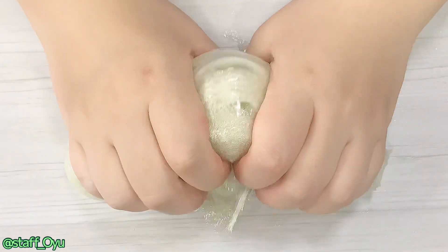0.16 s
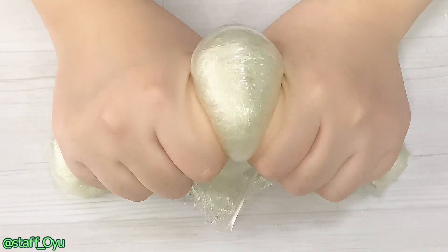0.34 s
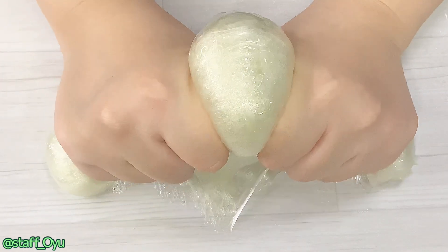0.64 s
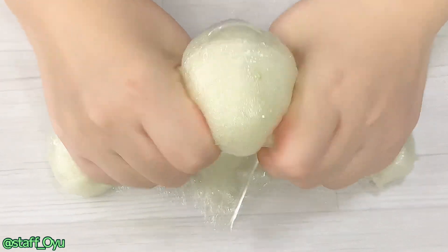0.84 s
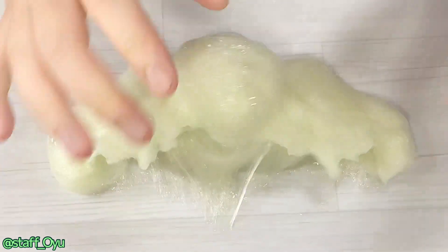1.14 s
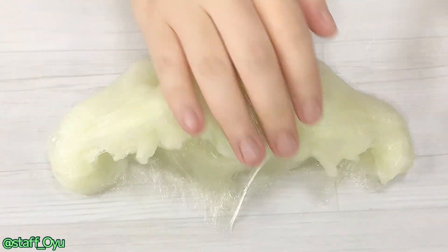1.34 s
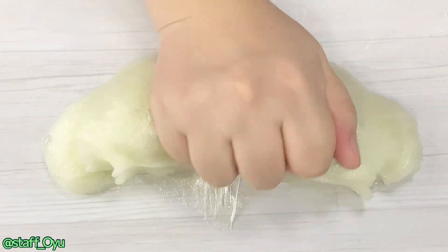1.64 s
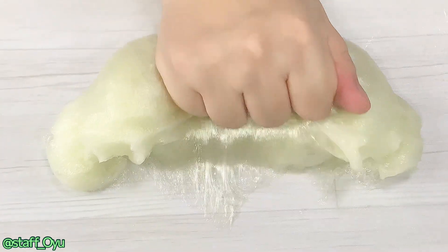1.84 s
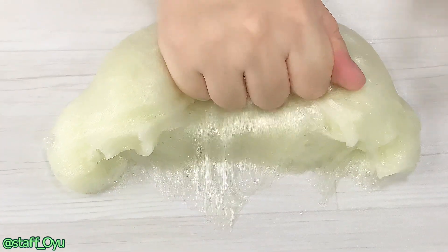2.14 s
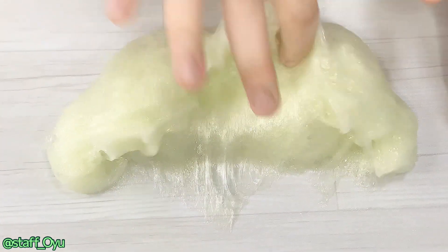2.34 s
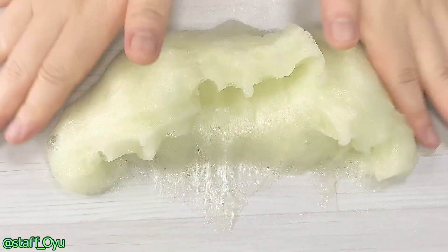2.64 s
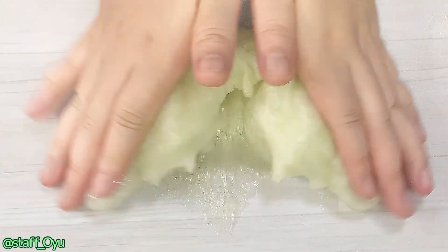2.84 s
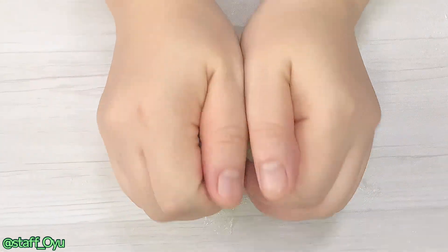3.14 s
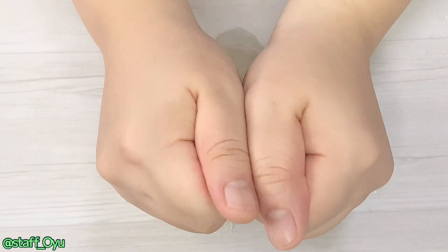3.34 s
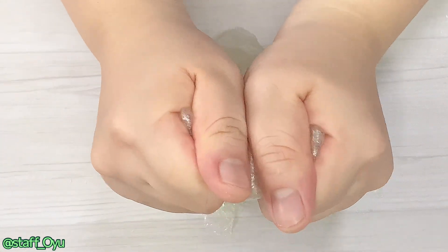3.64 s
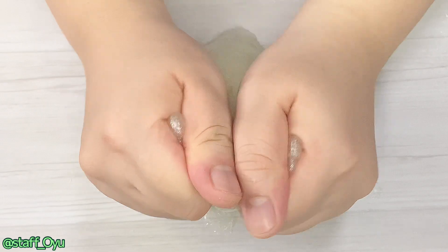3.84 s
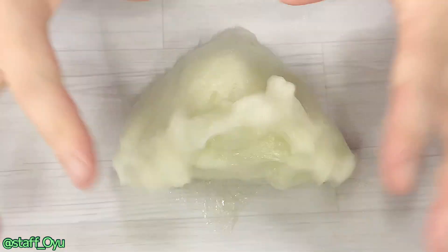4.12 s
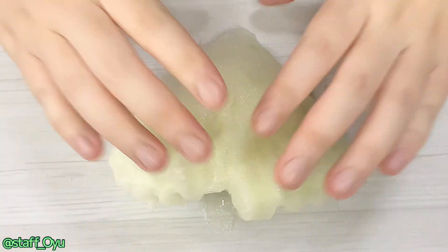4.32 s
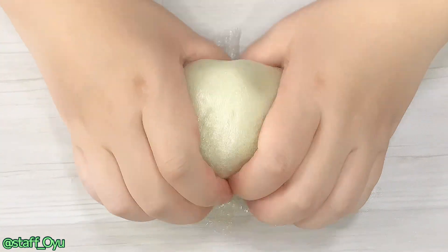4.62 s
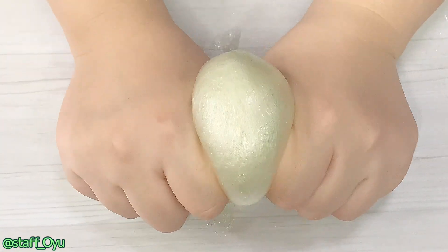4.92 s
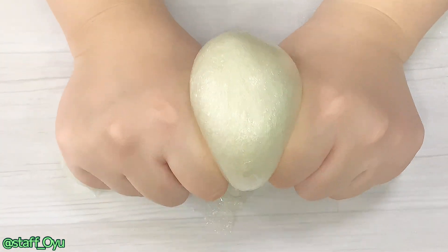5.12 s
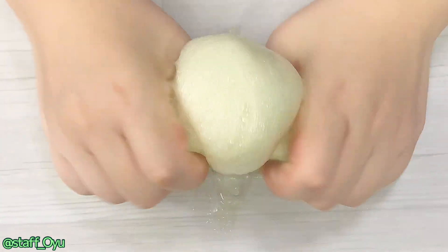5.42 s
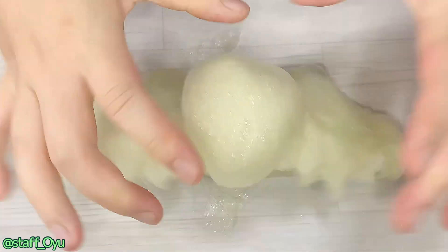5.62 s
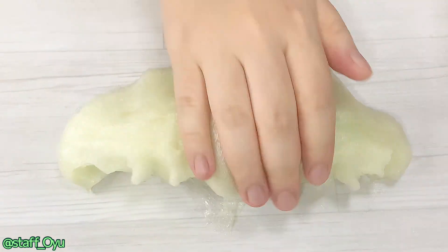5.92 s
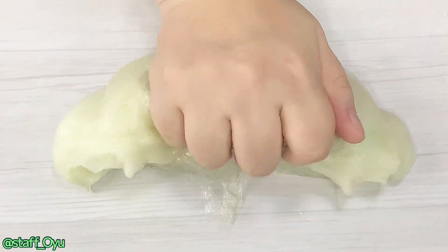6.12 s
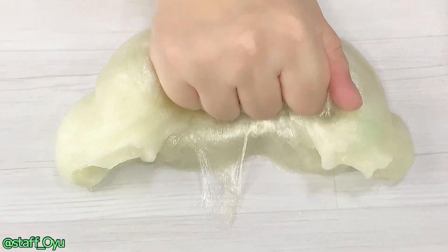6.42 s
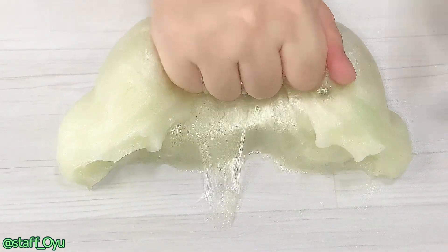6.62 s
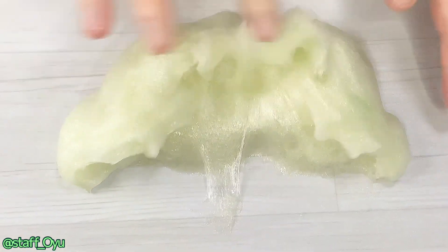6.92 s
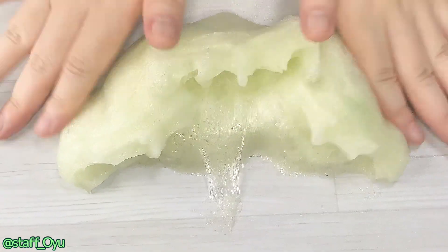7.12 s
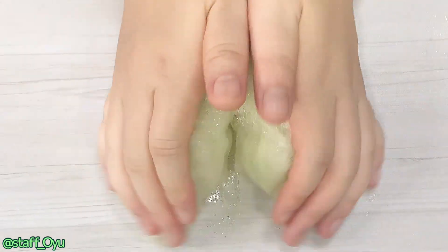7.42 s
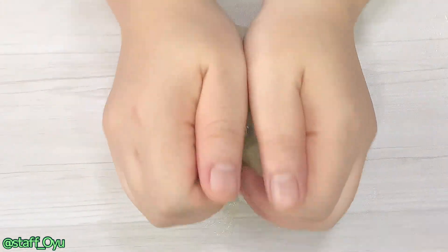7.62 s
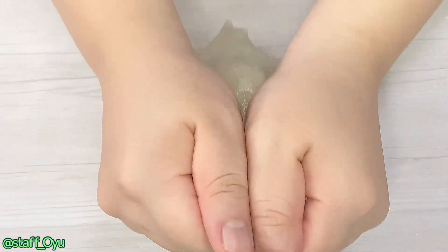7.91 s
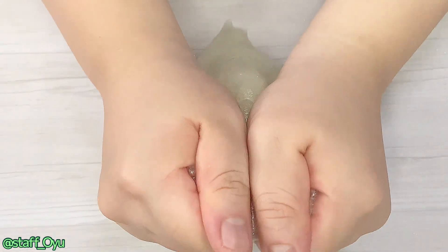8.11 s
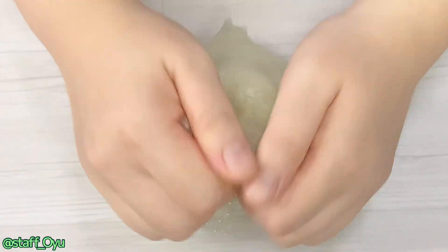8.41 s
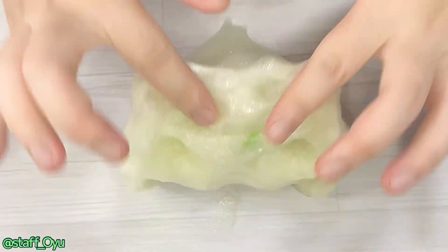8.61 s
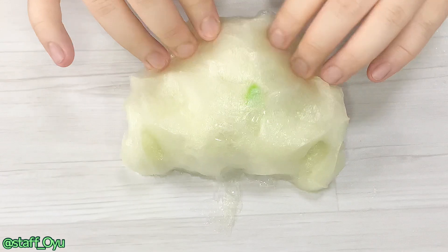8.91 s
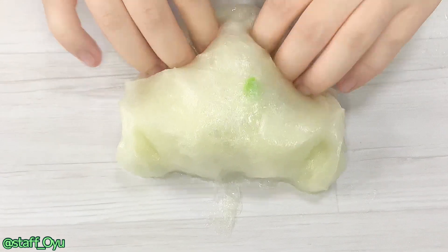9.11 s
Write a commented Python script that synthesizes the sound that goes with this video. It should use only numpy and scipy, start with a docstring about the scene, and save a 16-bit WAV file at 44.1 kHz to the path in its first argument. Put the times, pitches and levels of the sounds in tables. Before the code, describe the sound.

Hands squeeze wet slime on a table, close to the microphone in a dry room, over a faint steady low hum and hiss. From the start to about 0.7 seconds air pockets burst in quick sharp clicks and wet pops within a sticky fizz, ending in a tiny click-like squeak. The hands peel free with a soft gurgling squelch near 0.8. More crackling bursts come at 1.5 to 2, 3.1 to 3.7, 4.6 to 5.2, 6 to 6.6 and 7.6 to 8.3 seconds. The one around 3.5 is the densest and includes a low puff of air. Each is followed by a quieter sticky release, near 2.2, 3.9, 5.4, 6.7 and 8.4 seconds, with short lulls between rounds. Soft thuds sound on the table now and then, most clearly near 5.4. After 8.6 only a few faint ticks remain until just past 9 seconds.

```python
"""Squeezing wet slime

Hands squeeze and release a lump of wet slime on a table, close to a microphone with two openings.
Trapped air pockets burst with a snap, a falling pop and a knock in the table top. Sticky film peels
from the skin in a gurgling fizz, escaping air puffs and squeaks, and fingers thud softly.
A mains hum and a faint hiss lie under it all."""
import sys
import numpy as np
from scipy import signal
from scipy.fft import rfft, irfft
from scipy.io import wavfile
from scipy.ndimage import uniform_filter1d

SR = 44100
rng = np.random.default_rng(int(sys.argv[2]) if len(sys.argv) > 2 else 0)


def wrap_up_sound(samples):
    """Save the sound to the file named by the first command line argument, as 16-bit audio."""
    columns = np.atleast_2d(samples).T
    # keep every value between -1 and 1, then stretch to whole-number steps
    tamed = np.clip(columns, -1, 1)
    steps = np.round(tamed * 32767).astype(np.int16)
    wavfile.write(sys.argv[1], SR, steps)


N = 408366

# Air pockets bursting: t/s, snap/dB, its bright part over its dull part/dB,
# upper pop/dB, lower pop/dB, table knock/dB
POCKETS = [(0.1024, -26.5, -7, -26.5, -35.5, -48.5), (0.1545, -21, -18, -30, -22, -38),
           (0.171, -30.5, -9, -26, -26, -41.5), (0.1791, -24.5, -18.5, -32, -29.5, -41),
           (0.2221, -33, 6.5, -26.5, -36, -56.5), (0.2564, -20.5, -10, -9.5, -11.5, -22),
           (0.2643, -21.5, -16, -15, -47.0, -46), (0.3082, -25.5, -7.5, -14.5, -23.5, -49),
           (0.3294, -20.5, 11.5, -24, -27.5, -48), (0.338, -24.5, -8, -31, -38.5, -61),
           (0.3592, -16.5, 14.5, -32.5, -32, -65), (0.402, -22, 17.5, -35.5, -37.5, -42.5),
           (0.4127, -14, -9.5, -9.5, -24, -31.5), (0.4409, -19.5, 6.5, -11, -25, -61.5),
           (0.4711, -20, 6.5, -33, -47.5, -61), (0.496, -9.5, 8.5, -16.5, -21, -46.5),
           (0.5059, -18, -1.5, -11, -17.5, -36), (0.511, -14, 4.5, -24, -44, -55.5),
           (0.519, -11.5, 9, -21.5, -25.5, -37), (0.53, -16, 11.5, -19, -26.0, -50.5),
           (0.5492, -22.5, 1, -30.5, -37.5, -44.5), (0.6477, -19.5, 2.5, -37, -29, -39),
           (0.865, -27, 0, -35, -29, -28.5), (1.5007, -32.5, -2.5, -25, -63.5, -52),
           (1.5214, -27, -0.5, -37, -47, -52), (1.5265, -47, 6, -25.5, -24.5, -41),
           (1.5412, -25, 12, -35.5, -33.5, -62.5), (1.553, -26, -4.5, -16, -19, -36),
           (1.5858, -21.5, 3.5, -30.5, -35.5, -48.5), (1.596, -19.5, -6.5, -21, -37.5, -51.5),
           (1.6033, -24.5, -10.5, -8, -16, -34.5), (1.6107, -13.5, 11.5, -24.5, -50, -50),
           (1.6185, -9.5, -2, -16, -27.5, -29.5), (1.6538, -20, 4.5, -22, -31, -44),
           (1.6794, -13, 13.5, -30, -38, -50.5), (1.6998, -19, 7, -36, -42, -55.5),
           (1.723, -16, 10.5, -36, -41, -40), (1.728, -7.5, 7, -18, -27, -39.5),
           (1.734, -10.5, -0.5, -6.5, -26, -21.5), (1.76, -9, 10.5, -41, -37.5, -52.5),
           (1.7818, -14.5, 6, -38, -31, -46.5), (1.796, -13, 7, -30.5, -42.5, -50.5),
           (1.8334, -23.5, 14, -38.5, -42.5, -50.5), (1.8529, -17, 4, -18, -34.5, -44),
           (1.912, -27, -9, -24.5, -26, -41.5), (1.9504, -30, -6, -8.5, -26, -34.5),
           (2.0127, -13.5, 9.5, -21.5, -36, -45.5), (2.1931, -60, -11, -36, -35, -43),
           (2.2147, -36, -17, -45, -41, -38.5), (2.9972, -47, -1.5, -36, -37, -59),
           (3.1076, -31, -8.5, -39, -32.5, -50.5), (3.1798, -27.5, -2.5, -30.5, -53.5, -51),
           (3.2304, -25.5, -2.5, -40.5, -37.5, -47.5), (3.2562, -24.5, -2.5, -24.5, -33.5, -57.5),
           (3.2635, -8.5, -4.5, -15, -21, -32.5), (3.29, -17.5, -12.5, -29.5, -39, -52),
           (3.3319, -16.5, 6.5, -42.5, -41.5, -60.5), (3.3398, -14.5, 13, -43.5, -33, -58.5),
           (3.356, -17, 16, -38.5, -36.5, -45.5), (3.372, -12, 8, -35.5, -41, -46.5),
           (3.4056, -8, 6.5, -19.5, -18, -39.5), (3.4207, -13.5, 1.5, -27, -25.5, -49.5),
           (3.4292, -15.5, 2.5, -22.5, -31.5, -43), (3.4526, -10, 9, -22, -30, -38.5),
           (3.466, -13.5, 12, -13.5, -22.5, -28.5), (3.493, -8.5, 9.5, -30.5, -40.5, -53),
           (3.5039, -20, -8.5, -21, -27, -45.5), (3.5138, -24.5, 7, -22, -17, -45.5),
           (3.5305, -34, 0, -20, -20.5, -35), (3.545, -9.5, 3.5, -13.5, -19, -35),
           (3.5475, -11.5, 7, -27, -40, -50), (3.5556, -18.5, 9.5, -36.5, -40, -57.5),
           (3.5904, -10, 14.5, -29, -35, -34.5), (3.6024, -9.5, -5.5, -20, -19.5, -47.5),
           (3.621, -10, -2.5, -27, -25, -43), (3.684, -9.5, -1.5, -14.5, -17.5, -33),
           (3.7024, -24, -6, -15.5, -27.5, -23.5), (3.881, -28.5, 16, -32, -62, -36.5),
           (4.6443, -18.5, -1.5, -23.5, -36, -65), (4.6575, -24.5, 3, -41, -36, -68),
           (4.7299, -29.5, 12, -36, -38, -60), (4.8427, -37.5, 8, -36.5, -30.5, -37.5),
           (4.9257, -24, -10, -25.5, -39, -62.5), (4.9392, -24, 4.5, -38, -30.5, -55.5),
           (4.954, -18.5, -7, -30, -36.5, -52), (4.9581, -21, 0.5, -34.5, -37.5, -46.5),
           (4.9777, -19.5, 14.5, -24, -29.5, -73), (4.988, -19, 3.5, -22.5, -26, -46.5),
           (5.0017, -17, 5, -26.5, -33.5, -40), (5.0058, -15.5, -3.5, -20.5, -21, -29),
           (5.0558, -19.5, 10.5, -30.5, -47.5, -54.5), (5.065, -15, -13.5, 1.5, -10.5, -34.5),
           (5.11, -18, -4.0, -16.5, -25, -45.5), (5.1685, -8, 3.5, -23, -23, -45),
           (5.355, -40, -11, -40, -28.5, -46), (5.3867, -52, -4, -46, -45, -31),
           (5.995, -20.5, 28, -38, -44, -57), (5.9986, -46, -10, -25.5, -25.5, -55),
           (6.0767, -9, 2, -16, -26.5, -36.5), (6.1484, -14.5, 15, -33, -46.5, -64),
           (6.17, -10.5, 3.5, -14, -24, -44), (6.1824, -18, 0, -31.5, -37.5, -54),
           (6.1864, -18.5, 19, -34, -48, -67), (6.2249, -15, 15, -35, -39, -69),
           (6.2592, -9, 3.5, -25, -32, -44.5), (6.3093, -14, 4, -40, -32, -43.5),
           (6.3444, -24.5, -1.5, -43, -44.5, -67), (6.3929, -16.5, 12.5, -43, -39, -52),
           (6.406, -28, 0, -21, -32, -44.5), (6.455, -15, 23, -17, -42, -50),
           (6.4683, -13, 10, -33, -36.5, -60), (6.4964, -18, -2, -45, -37, -51),
           (6.5665, -26.5, 9, -32, -73, -75), (6.69, -43, -12.5, -34, -40, -38.5),
           (7.2713, -64, -7, -43, -39, -54.5), (7.4372, -46, 0, -37, -43, -42),
           (7.609, -38, -13, -29, -36, -52), (7.658, -30.5, -12, -31.5, -18.5, -26),
           (7.7234, -16, -5.5, -12, -28, -32), (7.758, -14.5, -2, -32, -27.5, -44),
           (7.7658, -9.5, -5, -21.5, -28.5, -37), (7.7676, -14, -9.5, -15.5, -18, -30),
           (7.7772, -20.5, -5, -30, -44, -59), (7.8253, -21, -14, -10.5, -18.5, -37.5),
           (7.8327, -21, -4, -14.5, -26.5, -44.5), (7.838, -19, 5, -31.5, -41, -64.5),
           (7.8637, -22, 9, -17, -29, -63), (7.8768, -10, -14.5, -11, -34, -27),
           (7.888, -22.5, 10.5, -22, -46, -44.5), (7.895, -22, -1.5, -26, -35, -61),
           (7.94, -11.5, 8.5, -37, -34.5, -49), (8.0039, -32.5, 10, -48.5, -43, -39),
           (8.031, -23, 17, -20.5, -34.5, -58), (8.0753, -15, 3, -45, -54, -44.5),
           (8.0849, -20.5, -4.5, -20.5, -31, -47), (8.1131, -27, -7.5, -26, -34, -48),
           (8.132, -17, 12, -35, -51, -52), (8.1728, -35, 8, -49, -29, -41),
           (8.3299, -32, 14, -31, -36, -58), (8.3454, -56, -3.5, -33, -29.5, -59),
           (8.3711, -34.5, -1.5, -30.5, -57, -36.5)]
# Sticky threads snapping without a pop: t/s, snap/dB
THREADS = [(0.0134, -45.5), (0.1691, -27.5), (0.1887, -30.5), (0.2259, -31), (0.2596, -22.5), (0.3947, -21),
           (0.4457, -25), (0.4634, -25.0), (0.4849, -23), (0.5322, -17.5), (0.5742, -25.0), (0.5844, -18.5),
           (0.6044, -28), (0.6528, -17.5), (0.7358, -43), (0.7603, -40), (1.3515, -49.5), (1.4381, -52.5),
           (1.4911, -36.5), (1.4969, -30), (1.524, -26.0), (1.5672, -24.5), (1.6869, -18), (1.7671, -20.0),
           (1.8133, -29), (1.8263, -27), (1.8606, -26), (1.9386, -30), (2.8715, -32.0), (2.8803, -30.0),
           (3.0984, -30.5), (3.2722, -22.5), (3.3046, -26), (3.3437, -21.5), (3.4371, -19.5),
           (3.5288, -15.5), (3.6462, -26.5), (3.8274, -38.5), (3.8622, -33.0), (4.4209, -54.5),
           (4.8756, -29.5), (4.8788, -23.5), (4.8873, -27.5), (4.973, -19.5), (5.1479, -21.5),
           (5.2938, -39), (5.9498, -57), (5.986, -34), (6.0108, -41), (6.1255, -34), (6.1762, -17.5),
           (6.2044, -34), (6.2417, -21), (6.3635, -29), (6.3877, -37), (6.4215, -21.5), (6.4318, -36),
           (7.1511, -34), (7.4044, -39), (7.4571, -37), (7.5975, -27), (7.7073, -45), (7.8577, -23),
           (7.946, -15.5), (7.9725, -26), (7.9891, -26), (8.0156, -32), (8.2101, -30.5), (8.2135, -30),
           (8.2191, -38), (8.2395, -30.5), (8.5137, -25.5), (8.8195, -43.5), (8.9485, -54), (8.9701, -53),
           (9.0038, -44.5), (9.0564, -48.5), (9.1285, -32.5)]
# Tones at which the table top rings: f/Hz, level/dB, time to fade by 60 dB/s
TABLE_TONES = [(319.6, -4, 0.072), (648, 1.5, 0.029)]
POP_LEAD_S = .0004  # a pocket starts to ring just before its skin gives way


def gain_of(db):
    """Turns decibels into a factor to multiply a sound by."""
    return 10 ** (np.asarray(db) / 20)


def evened(x):
    """Scales a signal to an average power of 1."""
    return x / np.sqrt(np.mean(x ** 2) + 1e-20)


def wobble(length, smoothing):
    """A random wavering; the more samples of smoothing, the slower it moves."""
    return evened(uniform_filter1d(rng.standard_normal(length), smoothing))


def value_at(points, hz):
    """Reads between the rows of a (frequency, value) table."""
    f, value = np.transpose(points)
    return np.interp(np.log(hz + 1), np.log(f + 1), value)


def add(mix, start_s, sound):
    """Mixes a sound in at the given time."""
    part = mix[round(start_s * SR):][:len(sound)]
    part += sound[:len(part)]


def coloured(x, points):
    """Shapes the tone by a (frequency, dB) table, cutting the bass below it; white noise keeps its power."""
    hz = np.fft.rfftfreq(x.shape[-1], 1 / SR)
    bass_cut_db = 30 * np.log2(.7 * points[0][0] / (hz + 1)).clip(0)
    return irfft(rfft(x) * evened(gain_of(value_at(points, hz) - bass_cut_db)), x.shape[-1])


def glide(t, hz, extra, fall_s):
    """Phase of a tone that starts at (1 + extra) times hz and sinks to hz."""
    return 2 * np.pi * hz * (t + extra * fall_s * (1 - np.exp(-t / fall_s)))


def swell(t, rise_s):
    """Rises to 1 in rise_s and dies away."""
    return t / rise_s * np.exp(1 - t / rise_s)


def hum():
    """Mains electricity hums in two low tones that waver a little in strength."""
    # Mains tones: f/Hz, average level/dB
    tones = [(60, -42.5), (180, -74)]
    t = np.arange(N) / SR
    waver = evened(sum(np.sin(2 * np.pi * (hz * t + rng.random())) for hz in np.geomspace(1, 12, 20)))
    steady = sum(gain_of(db) * np.sin(2 * np.pi * hz * t) for hz, db in tones)
    return np.sqrt(2) * gain_of(.5 * waver) * steady


def hiss():
    """Three separate faint, bass-heavy noises that come and go a little together."""
    # Tone of the hiss: f/Hz, relative level/dB
    colour = [(30, 0), (100, 1), (200, -14.5), (400, -23), (1000, -33.5), (3000, -41), (15500, -48),
              (16100, -68)]
    level_db = -61 + 1.3 * wobble(N, 2500)
    return gain_of(level_db) * coloured(rng.standard_normal((3, N)), colour)


def snaps():
    """A pocket's skin or a thread strains, then rips in a ragged crack with its own short whistle."""
    # Tone of the dull part of a snap: f/Hz, relative level/dB
    dull_colour = [(3200, -9), (5000, -7), (7000, -1), (9000, -2), (12000, -8), (16600, -31.5)]
    # Tone of the bright part: f/Hz, relative level/dB
    bright_colour = [(5000, -29.5), (9000, -3.5), (11000, -1.5), (15500, 2.5), (16000, -4.5),
                     (16600, -17.5)]
    dull, bright = np.zeros((2, N))
    rip_at = 200  # samples of straining before the rip
    t = (np.arange(900) - rip_at) / SR
    after = t.clip(0)
    strain = gain_of(-23) * np.exp(t.clip(None, 0) / .002) * (t <= 0)
    shape = strain + swell(after, .00019) + .2 * np.exp(-after / .003) * (t > 0)
    events = POCKETS + [(s, db, 5.5 + 6 * rng.standard_normal()) for s, db in THREADS]  # random brightness
    for s, db, bright_db, *_ in events:
        ragged, *noises = rng.standard_normal((3, len(t)))
        bright_share = 1 / (1 + gain_of(-2 * bright_db))
        shares = 1 - bright_share, bright_share
        for mix, noise, share, hz in zip((dull, bright), noises, shares, (5500, 11000)):
            whistle_hz = hz * np.exp(.35 * np.tanh(noise[0]))
            whistle = np.cos(glide(after, whistle_hz, .33, .00045))
            crack = shape * (gain_of(7.6 * ragged) * noise + 1.1 * whistle)
            strength = np.sqrt(np.mean(crack[rip_at:rip_at + 40] ** 2))
            add(mix, s - rip_at / SR, gain_of(db) * np.sqrt(share) * crack / strength)
    return coloured(dull, dull_colour) + coloured(bright, bright_colour)


def seething(events, offset_db, t):
    """Each (time, dB) event leaves the slime seething briefly; gives that power at the times t."""
    seconds, db = np.transpose(events)
    step_s, fade_s = t[1], .013
    kicks = np.bincount(np.ceil(seconds / step_s).astype(int), gain_of(2 * (db + offset_db)), len(t))
    return signal.lfilter([1], [1, -np.exp(-2 * step_s / fade_s)], kicks)


def kneading():
    """Hands press and pull free; gives the changing dB of fizz, squelch, crackle over fizz, and gurgles."""
    # Hands pressing the lump: touch/s, middle/s (where the fizz changes slope), end/s,
    # fizz at each of those three times/dB, squelch over fizz/dB, crackle over fizz/dB
    squeezes = [(0.052, 0.465, 0.63, -52, -43.5, -56, -3, 2), (1.5, 1.695, 2.063, -59, -46.5, -54, -8, 1),
                (2.671, 2.86, 3.13, -75, -61.5, -53, 2, -4),
                (3.216, 3.528, 3.86, -45, -33, -72, -13.5, -6.5),
                (4.409, 4.614, 5.04, -84.5, -52.5, -48.5, -3, 2),
                (4.88, 5.0, 5.21, -67.5, -40.5, -48, -12, -4),
                (6.006, 6.304, 6.53, -58, -50, -63, -5.5, -6.5),
                (7.156, 7.42, 7.54, -66.5, -61.5, -52.5, 4.5, -12),
                (7.66, 7.844, 8.62, -55.5, -41.5, -78, -7.5, -3.5),
                (8.621, 8.75, 9.84, -69.5, -76.5, -93, -1, -8.5)]
    # Hands pulling free: t/s, length/s, fizz/dB, squelch at its peak/dB, rise/s
    releases = [(0.781, 0.31, -54, -38.5, 0.06), (2.177, .22, -48.5, -42.5, 0.034),
                (3.832, 0.26, -47.5, -43.5, 0.079), (5.322, 0.28, -51, -37.5, 0.063),
                (6.667, .22, -47, -42, 0.043), (8.311, 0.24, -49, -42.5, 0.054)]
    onset_rate, fade_rate, let_go_rate, drain_rate = 207, 301.5, 619, 80.5  # dB per second
    step_s, resting_db = .001, -84.5
    t = np.arange(0, N / SR + step_s, step_s)
    pressed, wet, crisp, peeled, draining = np.zeros((5, len(t)))
    for touch, middle, end, *fizz_db, squelch_db, crackle_db in squeezes:
        level_db = np.interp(t, [touch, middle, end], fizz_db)
        level_db -= onset_rate * (touch - t).clip(0) + fade_rate * (t - end).clip(0)
        pressed += gain_of(2 * level_db)  # doubling the dB gives power, which adds up
        wet += gain_of(2 * (level_db + squelch_db))
        crisp += gain_of(2 * level_db) * crackle_db
    for start, length, fizz_db, squelch_db, rise in releases:
        stretch_db = -36.5 - onset_rate * (start - .058 - t).clip(0)  # first the film stretches faintly
        climb_db = -24 / rise * (start + rise - t).clip(0)
        shape_db = np.maximum(climb_db, stretch_db) - let_go_rate * (t - start - length).clip(0)
        peeled += gain_of(2 * (fizz_db + shape_db))
        draining += gain_of(2 * (squelch_db + shape_db - drain_rate * (t - start - rise).clip(0)))
    after_snaps = seething([row[:2] for row in POCKETS + THREADS], -23.5, t)
    after_pops = seething([(s, lower_db) for s, *_, lower_db, _ in POCKETS], -20.5, t)
    smooth = peeled + gain_of(2 * resting_db)
    fizz = pressed + after_snaps + smooth
    squelch = wet + after_pops + draining + gain_of(2 * (resting_db - 3.5))
    crackle_db = (crisp - .5 * after_snaps - 12.5 * smooth) / fizz  # an average: louder parts count more
    levels = 10 * np.log10(fizz), 10 * np.log10(squelch), crackle_db, 10 * np.log10(draining + 1e-20) - 6
    return [np.interp(np.arange(N) / SR, t, level) for level in levels]


def sticky_film(fizz_db, squelch_db, crackle_db):
    """Countless threads snap in a fizz, tiny pockets crackle in it, the mass squelches in slower lumps."""
    # Tone of the fizz: f/Hz, relative level/dB
    fizz_colour = [(1500, -11.5), (2500, -5.5), (3800, 4.5), (6000, 2.5), (7500, 1), (10000, 0.5),
                   (15500, 3), (16100, -34.5)]
    # Tone of the squelch: f/Hz, relative level/dB
    squelch_colour = [(80, -7), (150, -4), (320, -3.5), (600, -8.5), (900, -10), (1300, 0), (1600, -6.5),
                      (3000, -14)]
    crackles_per_s = 260
    sizes = gain_of(7 * np.minimum(rng.exponential(1, N), 2.5))
    sizes *= rng.random(N) < crackles_per_s / SR
    power = signal.oaconvolve(sizes ** 2, swell(np.arange(200) / SR, .00032))[:N].clip(0)
    crackle = gain_of(crackle_db) * evened(np.sqrt(power) * rng.standard_normal(N))
    # the more it crackles, the more uneven the noise is
    flutter_db = .12 * (crackle_db + 25.5).clip(0) * wobble(N, 220)
    lumps_db = .18 * (crackle_db + 27.5).clip(0) * wobble(N, 400)
    fizz = gain_of(fizz_db) * (gain_of(flutter_db) * rng.standard_normal(N) + crackle)
    squelch = gain_of(squelch_db) * (gain_of(lumps_db) * rng.standard_normal(N) + crackle)
    return coloured(fizz, fizz_colour) + coloured(squelch, squelch_colour)


def pops():
    """Each opened pocket rings for a few falling cycles: an upper pop, a lower pop and a deep gulp."""
    out, t = np.zeros(N), np.arange(900) / SR
    for s, _, _, upper_db, lower_db, knock_db in POCKETS:
        luck = rng.standard_normal(5)
        upper = np.cos(glide(t, 2000 * np.exp(.13 * luck[0]), 1.9, .00086) + 3 * luck[1])
        lower = np.cos(glide(t, 1270 * np.exp(.074 * luck[2]), .99, .00029) + 3 * luck[3])
        gulp = .85 * np.sin(glide(t, 300 * np.exp(.12 * luck[4]), 2.2, .0025))
        for tone, db, rise_s in (upper, upper_db, .00036), (lower, lower_db, .00075), (gulp, knock_db, .0019):
            add(out, s - POP_LEAD_S, gain_of(db) * tone * swell(t, rise_s))
    return out


def table_knocks():
    """Each bursting pocket kicks the table top, which rings briefly."""
    kicks, t = np.zeros(N), np.arange(3000) / SR
    for s, *_, knock_db in POCKETS:
        add(kicks, s - POP_LEAD_S, gain_of([knock_db]))
    ring = sum(gain_of(db - 60 * t / fade_s) * np.sin(2 * np.pi * hz * t) for hz, db, fade_s in TABLE_TONES)
    return signal.oaconvolve(kicks, ring * (1 - np.exp(-t / .0003)))[:N]


def air_puffs():
    """Air hits the microphone in low, sinking thumps; also gives a brief dip in dB after each."""
    # Puffs of air: t/s, level/dB, pitch scale/Hz, dip scale/dB, recovery/s
    puffs = [(.53, -56, 240, -9.5, 0.17), (1.831, -53.5, 245, -9.5, 0.08), (3.589, -28, 352, -5.5, 0.26),
             (7.939, -37.5, 315, -20, 0.17)]
    thumps, dips = np.zeros((2, N))
    t = np.arange(SR) / SR
    for s, db, hz, dip_db, recovery in puffs:
        add(thumps, s, gain_of(db) * np.sin(glide(t, .2 * hz, 6.8, .0036)) * swell(t, .0063))
        add(dips, s, dip_db * (1 - np.exp(-t / .018)) * np.exp(-(t / recovery) ** 2))
    return thumps, dips


def squeak():
    """A flap of slime flutters in the escaping air, then quivers on faintly and unevenly."""
    # Air forced through a slit: t/s, level/dB, f/Hz, length/s
    leaks = [(0.646, -9.5, 3464, 0.0054)]
    out, t = np.zeros(N), np.arange(6000) / SR
    for s, db, hz, length in leaks:
        phase = 2 * np.pi * hz * t
        burst = np.sin(np.pi * (t / length).clip(0, 1)).clip(0) ** .39
        quiver = .11 * wobble(len(t), 110) * np.exp(-t / .022) * (t > length)
        add(out, s, gain_of(db) * ((burst + quiver) * np.sin(phase) + .13 * burst * np.cos(2 * phase)))
    return out


def gurgles(level_db):
    """Little hollows close as the hands pull free, each ringing for a few falling cycles."""
    out, t = np.zeros(N), np.arange(900) / SR
    gurgles_per_s, pitches_hz = 260, 1020 * np.exp(np.linspace(-.7, .7, 7))
    for hz in pitches_hz:
        closings = rng.uniform(.15, 1, N) ** 2 * (rng.random(N) < gurgles_per_s / len(pitches_hz) / SR)
        blip = np.sin(glide(t, hz, .52, 1.1 / hz)) * swell(t, 1.8 / hz)
        out += signal.oaconvolve(closings, blip)[:N]
    return gain_of(level_db) * evened(out)


def soft_thuds():
    """A slow push rings the table top's lowest tone, put out of tune by the slime lying on it."""
    # Fingers or slime landing softly on the table: t/s, level/dB
    landings = [(1.606, -30), (1.953, -29), (3.002, -41), (4.576, -32), (5.364, -24), (7.272, -40),
                (7.421, -36), (8.367, -45)]
    out, t = np.zeros(N), np.arange(4000) / SR
    hz, _, fade_s = TABLE_TONES[0]
    push = 1 - np.exp(-(t / .0066) ** 2)
    for (s, db), detune in zip(landings, rng.uniform(.8, 1.1, len(landings))):
        ring = np.sin(glide(t, hz * detune, .3, .006)) * evened(.6 + wobble(len(t), 120))
        add(out, s, gain_of(db - 60 * t / fade_s) * ring * push)
    return out


def microphone(x):
    """Sound reaches the left and right openings with a lag and a level gap that depend on pitch."""
    # How far the left opening is ahead: f/Hz, phase/radians
    left_lead = [(0, 0), (860, .2), (1640, .1), (2330, 1.2), (3010, .9), (3500, 1.8), (4400, 2.7),
                 (5080, 3.5), (6370, 5.7), (9000, 9.5), (15600, 19.2)]
    # Level gap between the openings: f/Hz, left minus right/dB
    balance = [(60, -1.5), (140, -3), (400, -5.5), (800, -6.5), (1300, -1.5), (2400, -1), (4000, -1)]
    hz = np.fft.rfftfreq(N, 1 / SR)
    half_gap = gain_of(value_at(balance, hz) / 2) * np.exp(.5j * np.interp(hz, *np.transpose(left_lead)))
    return irfft(rfft(x) * np.array([half_gap, 1 / half_gap]), N)


def room(x):
    """Many small echoes, one in every 20 samples; each pitch range dies away at its own speed."""
    # How long the room rings: f/Hz, time to fade by 60 dB/s
    fade_times = [(200, 0.054), (1000, 0.2), (4000, 0.017), (12000, 0.074)]
    echoes = np.zeros((2, SR // 2))
    arrivals = np.arange(200, SR // 2 - 20, 20) + rng.integers(0, 20, (2, (SR // 2 - 201) // 20))
    np.put_along_axis(echoes, arrivals, rng.choice([-1., 1.], arrivals.shape), 1)
    hz, t, bands = signal.stft(echoes, SR, nperseg=256)
    fade = gain_of(-60 * t / value_at(fade_times, hz)[:, None])
    tail = signal.istft(bands * fade, SR, nperseg=256)[1]
    return signal.fftconvolve(x[None], tail / np.linalg.norm(tail[0]), axes=1)[:, :N]


def scene():
    """The slime in its room, over hum and hiss; the hum dips after each puff of air."""
    fizz_db, squelch_db, crackle_db, gurgle_db = kneading()
    slime = snaps() + pops() + table_knocks() + soft_thuds()
    slime += sticky_film(fizz_db, squelch_db, crackle_db) + gurgles(gurgle_db) + squeak()
    thumps, dip_db = air_puffs()
    shared_hiss, *side_hiss = hiss()
    lows = uniform_filter1d(slime, size=24)
    # the treble wavers quickly and at random between left and right
    side_db = 2.4 * wobble(N, 150)
    treble = microphone(slime - lows) * gain_of([side_db, -side_db])
    steady = microphone(lows + thumps + hum() * gain_of(dip_db) + shared_hiss)
    return steady + treble + gain_of(-16.5) * room(slime) + .5 * np.array(side_hiss)


def record(dry):
    """Rounds off the loudest peaks, then cuts the highest treble."""
    rounded = dry / (1 + abs(dry) ** 4) ** .25
    treble_cut = signal.firwin(511, 16750, window=("kaiser", 9), fs=SR)
    return .9 * signal.oaconvolve(rounded, treble_cut[None], "same")


dry = scene()
out = record(dry)
wrap_up_sound(out)
```